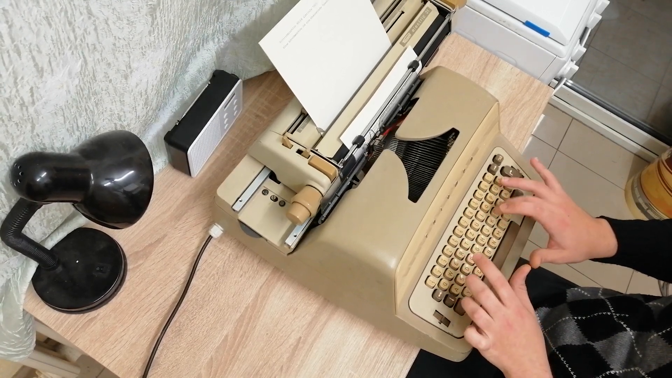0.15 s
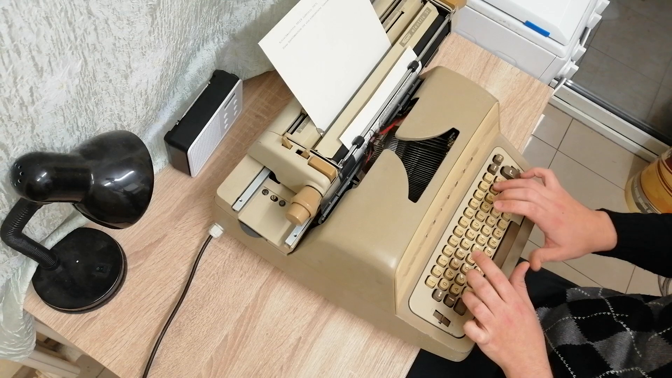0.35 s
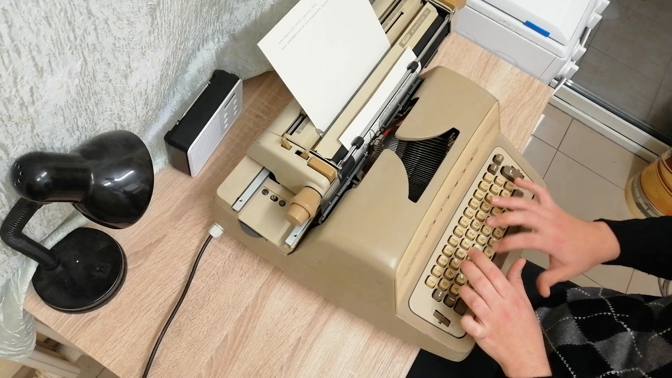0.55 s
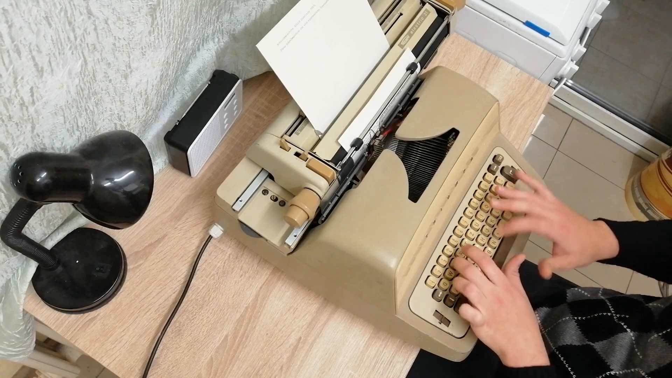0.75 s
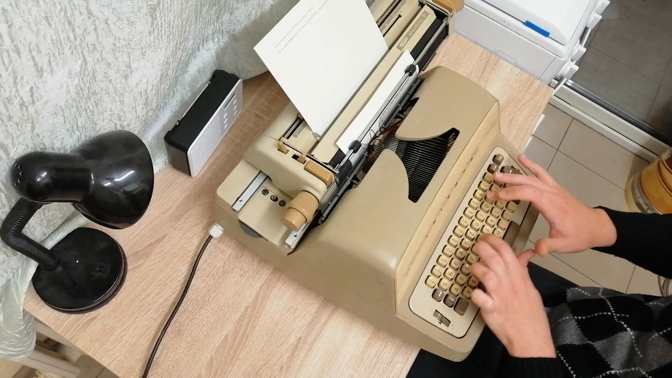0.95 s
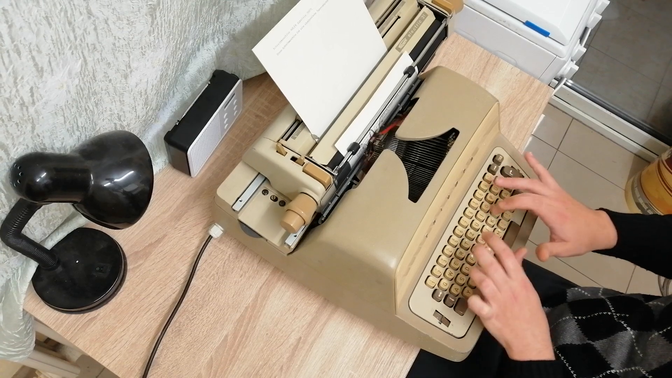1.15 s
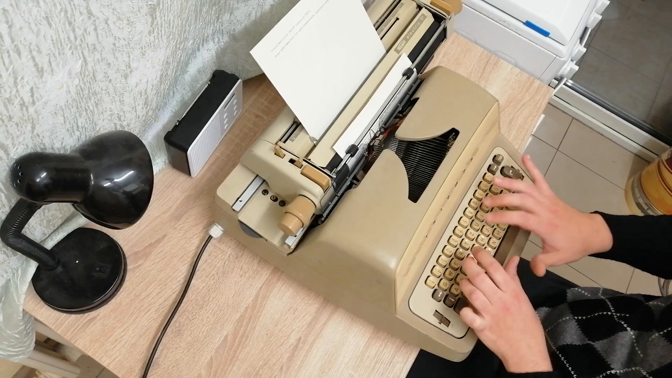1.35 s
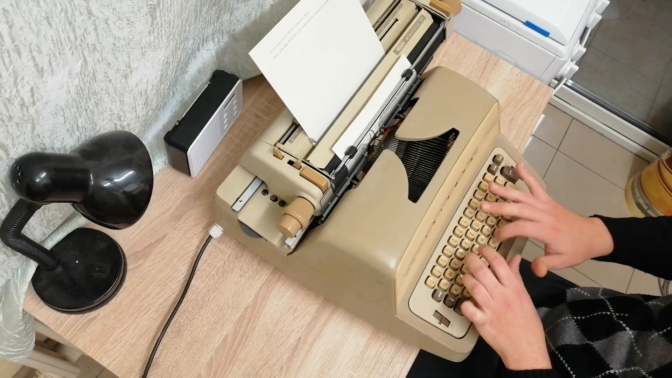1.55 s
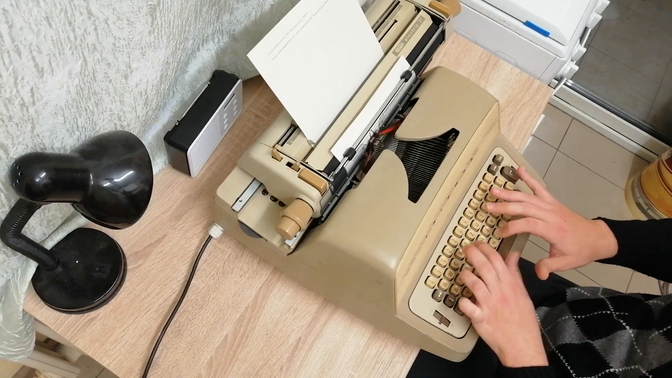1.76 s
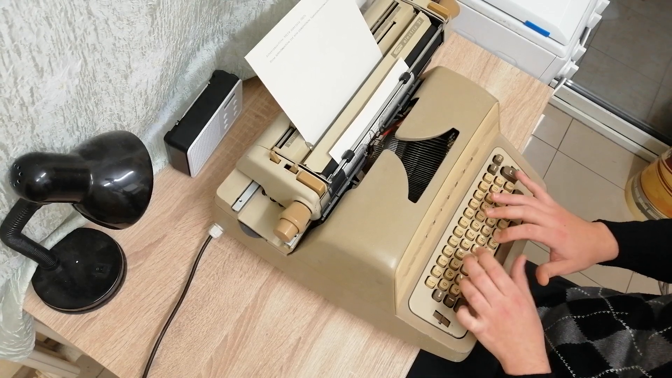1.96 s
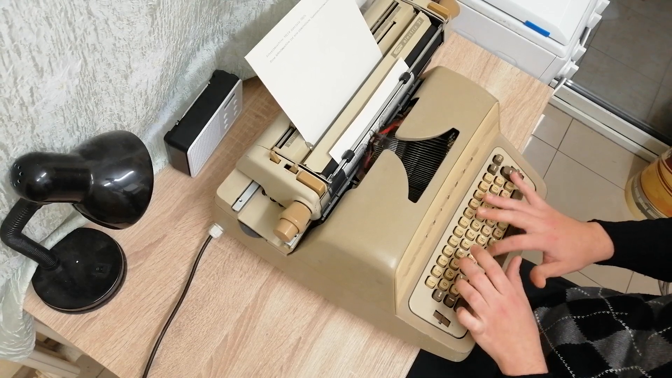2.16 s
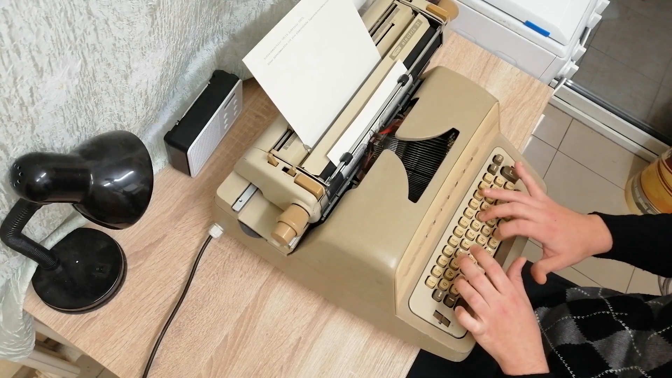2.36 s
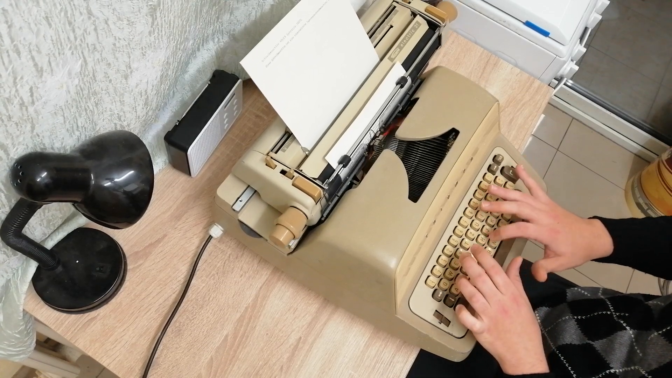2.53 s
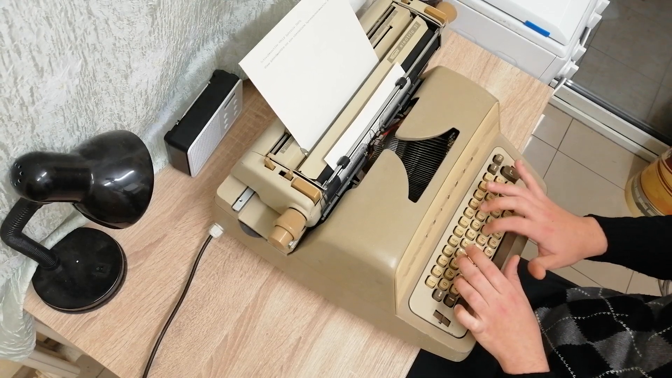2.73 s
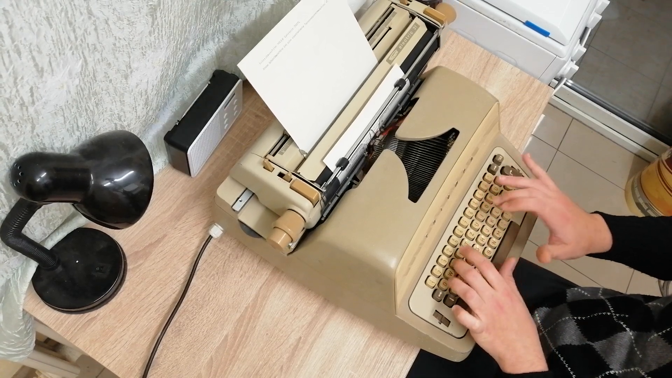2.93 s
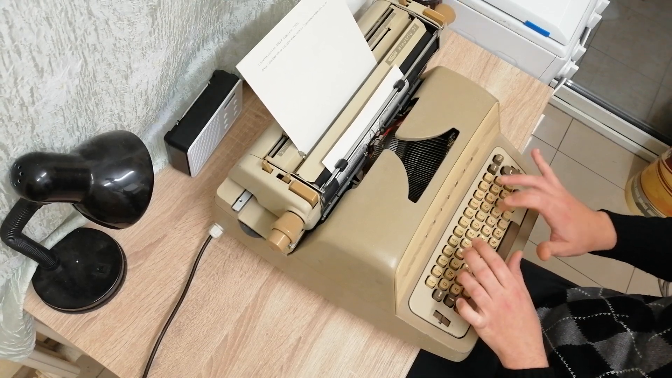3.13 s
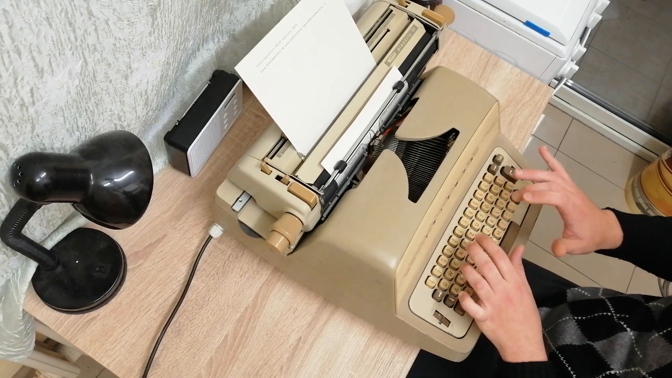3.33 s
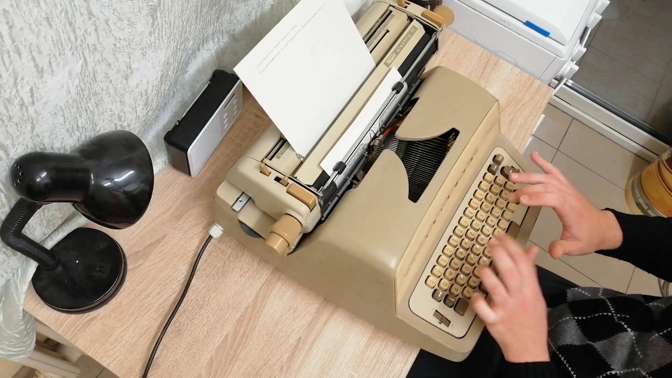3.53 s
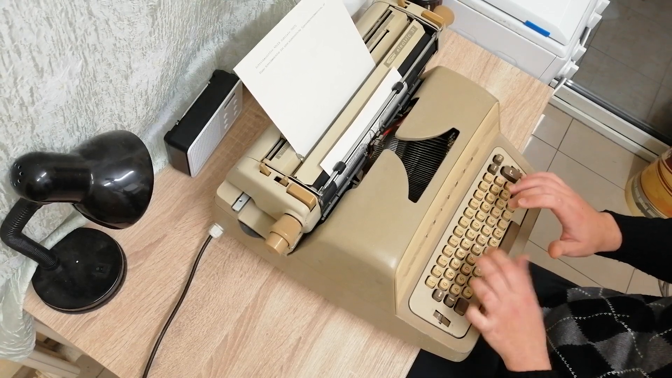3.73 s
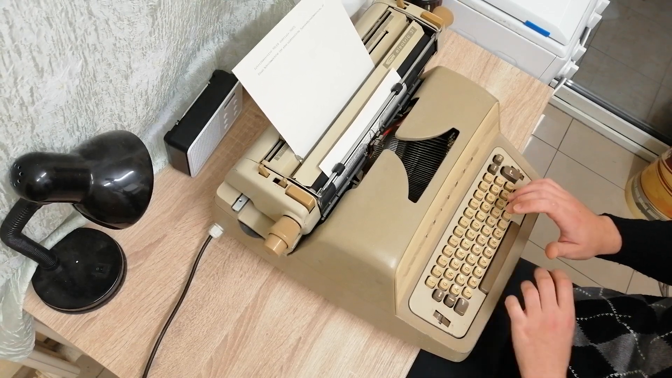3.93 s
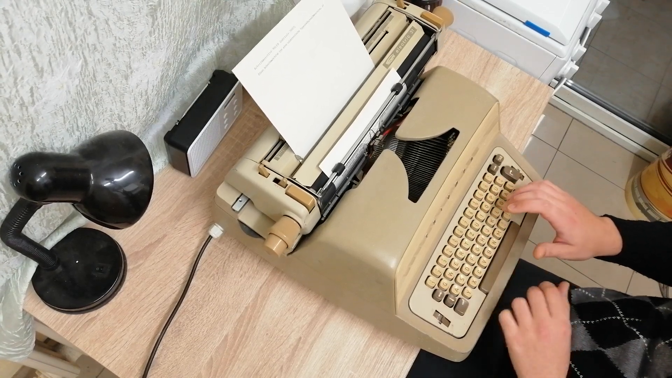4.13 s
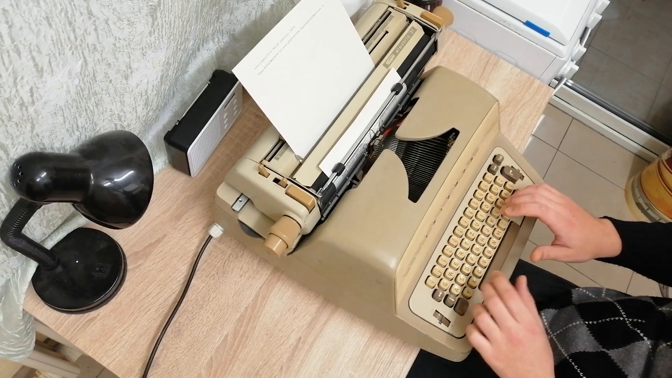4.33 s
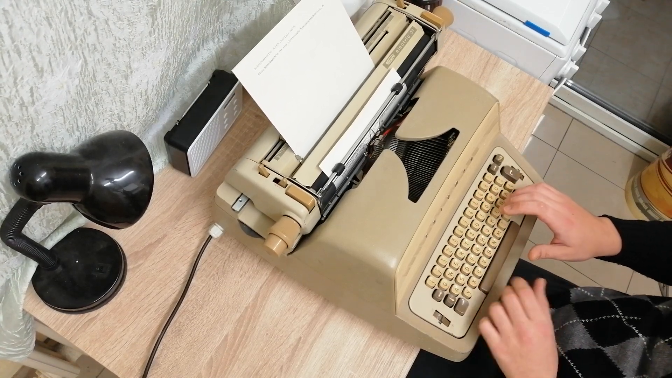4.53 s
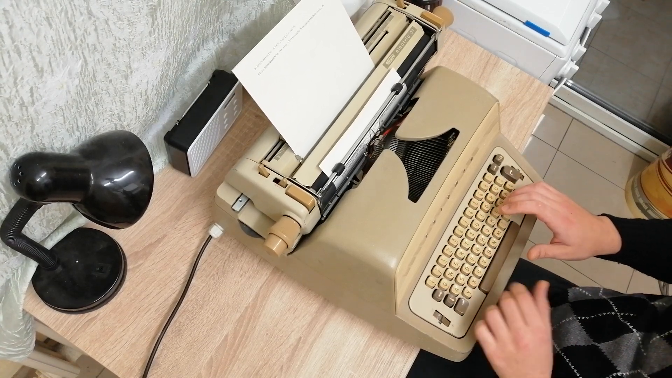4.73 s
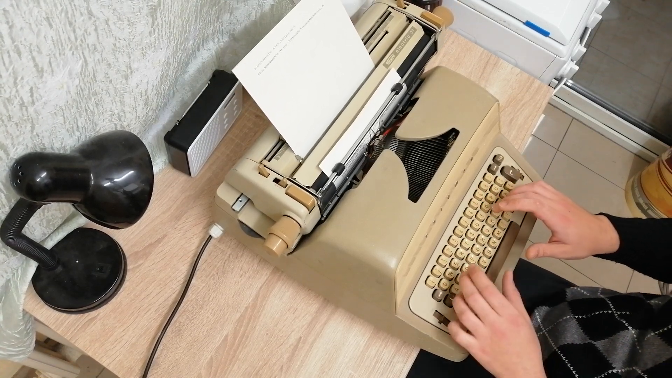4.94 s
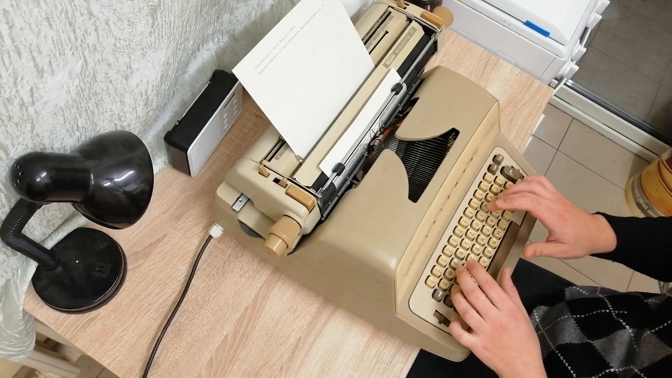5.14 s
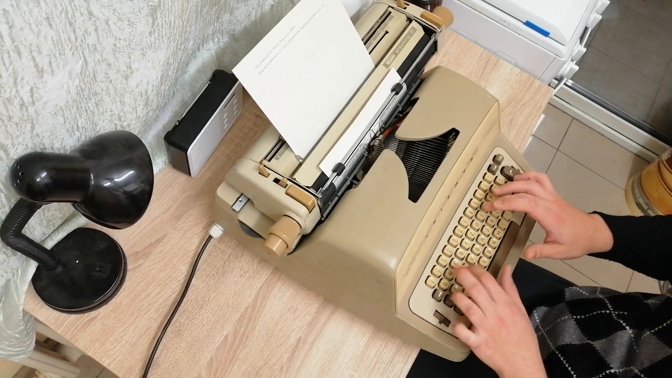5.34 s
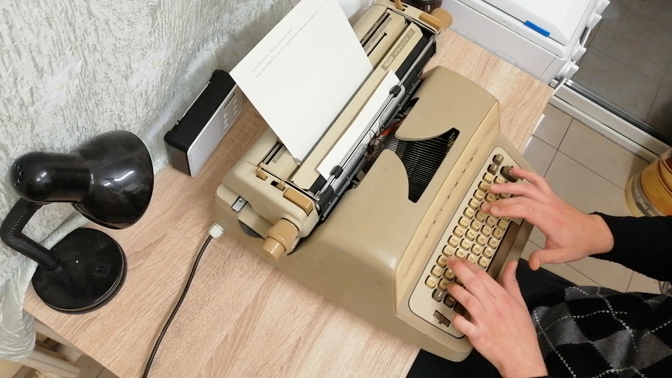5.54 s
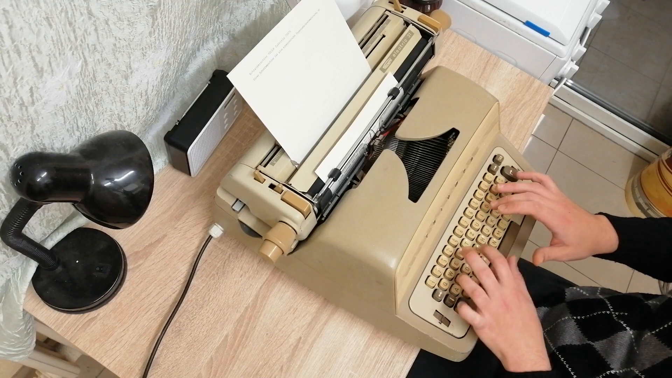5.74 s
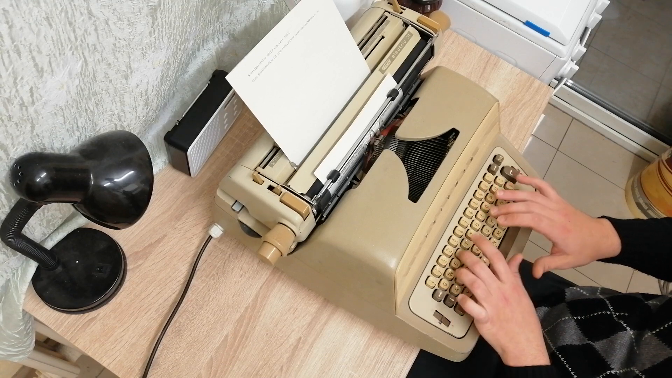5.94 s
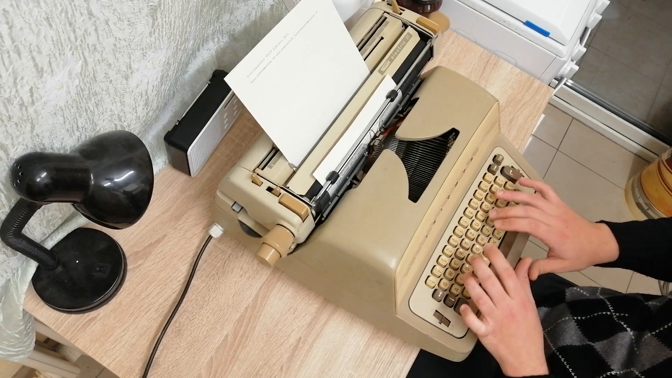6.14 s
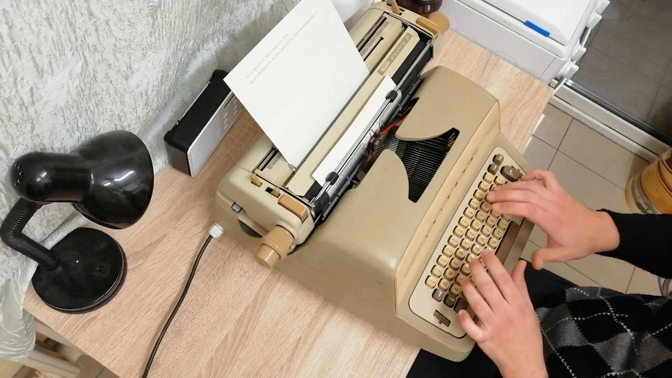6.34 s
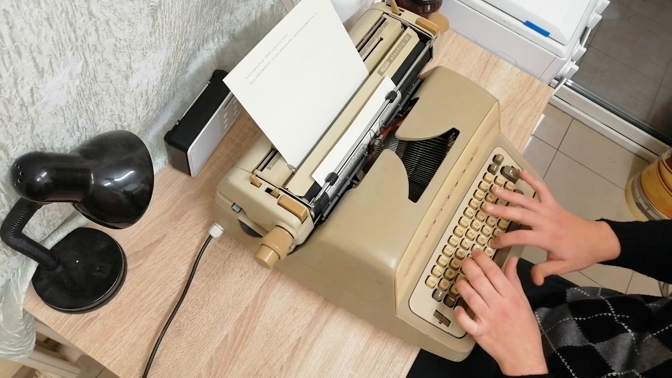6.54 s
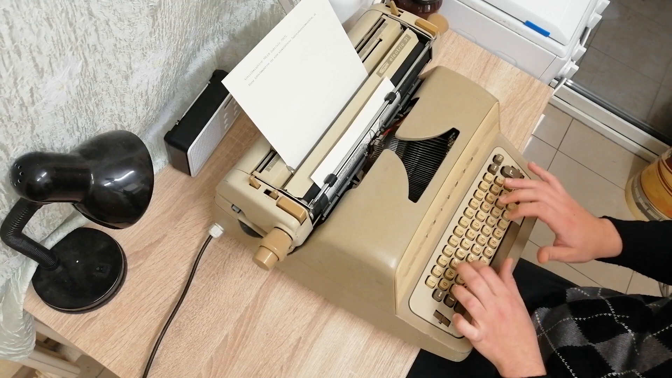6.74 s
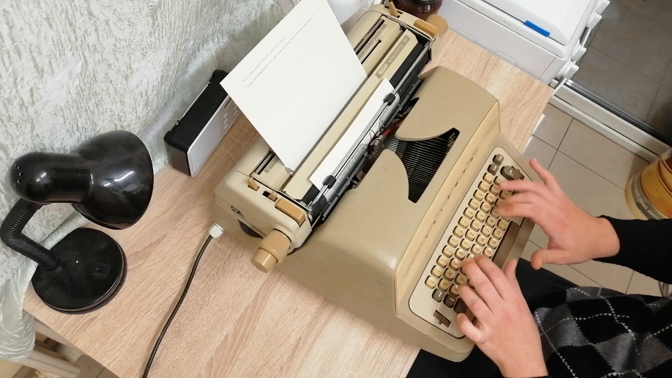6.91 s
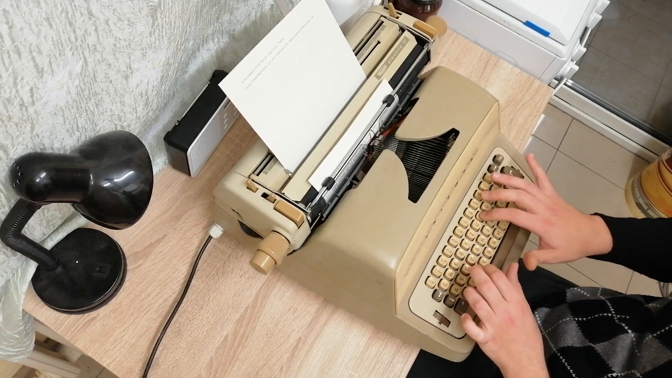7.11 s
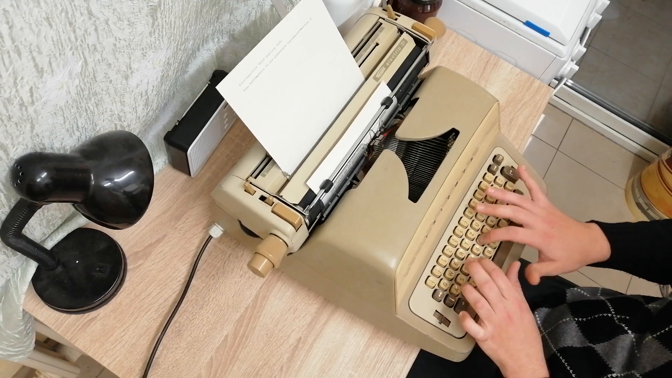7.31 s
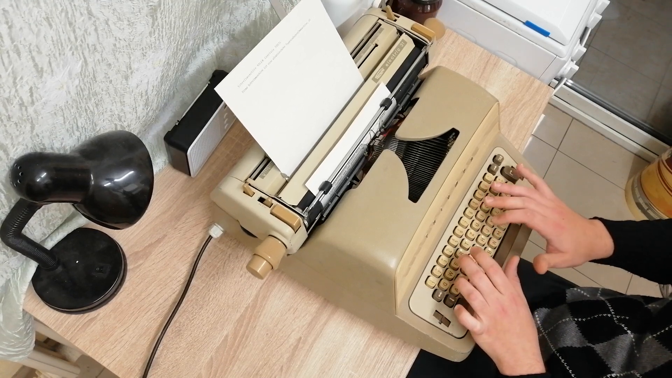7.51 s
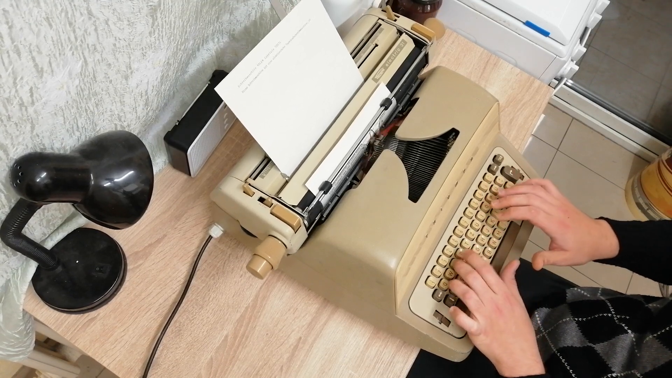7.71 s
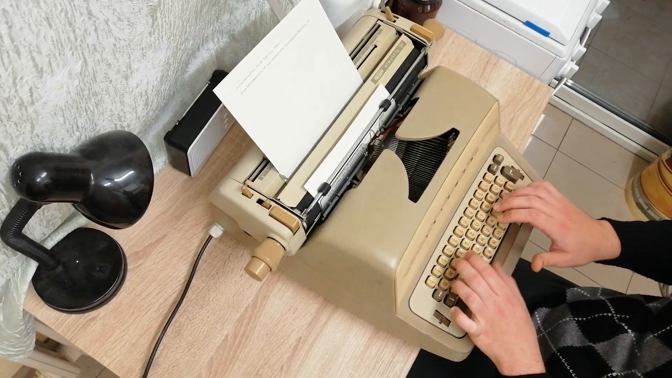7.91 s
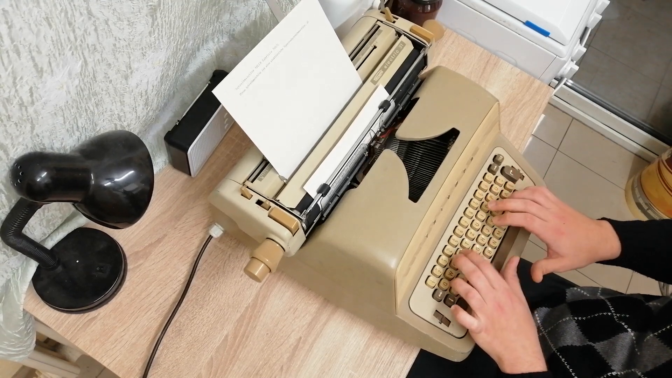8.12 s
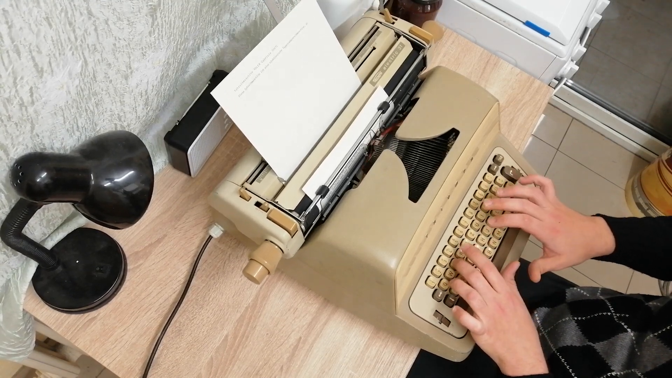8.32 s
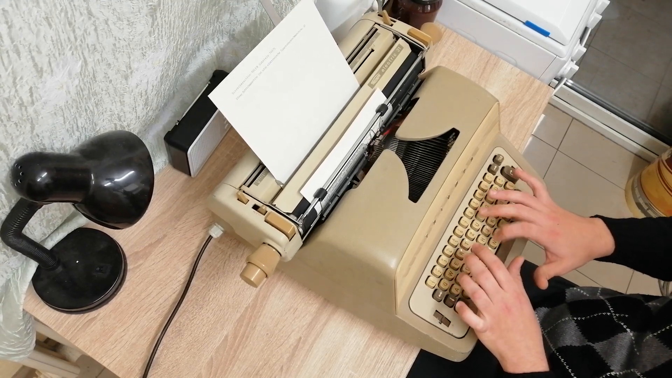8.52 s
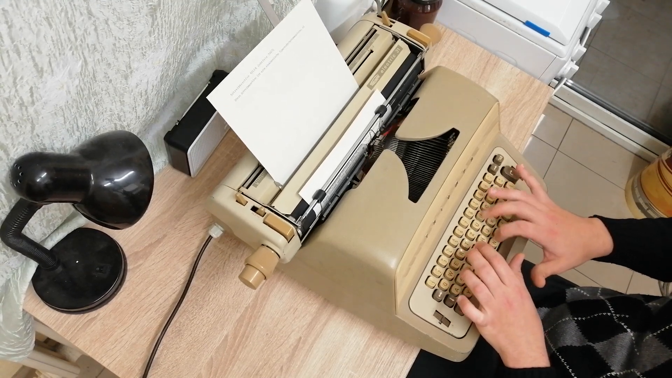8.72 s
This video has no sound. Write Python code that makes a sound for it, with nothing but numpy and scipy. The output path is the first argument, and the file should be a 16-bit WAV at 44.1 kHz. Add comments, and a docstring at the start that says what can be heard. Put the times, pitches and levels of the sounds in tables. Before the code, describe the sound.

Two bursts of crisp electric typewriter typing in a quiet room, each metallic snap followed by a low thud, split by a short near-silent pause.

```python
"""Electric typewriter in a quiet room

Someone types two bursts of words on a machine on a wooden desk, brushing and nudging keys in the pause.
Each letter: a key click, a lever's fling, the sharp crack of type on paper with the ring of the frame
(noise shaped by resonances and decay), the bar's return, and the carriage's step with a low damped thud.
The shift key thumps the type basket; a spring sings faintly; the motor hums in sine lines over a soft whir."""
import sys
import numpy as np
from scipy import signal
from scipy.fft import rfft, irfft
from scipy.io import wavfile
from scipy.ndimage import uniform_filter1d

SR = 44100
rng = np.random.default_rng(int(sys.argv[2]) if len(sys.argv) > 2 else 0)


def unload_wav(signal):
    """Save mono or channel-first audio to the path in sys.argv[1] as 16-bit WAV at rate SR, clipped to [-1, 1]."""
    wavfile.write(
        sys.argv[1],
        SR,
        np.round(np.clip(np.atleast_2d(signal).T, -1, 1) * 32767).astype(np.int16),
    )


N = 386757

# times (s) and frequencies (Hz) of one half-second blow
T = np.arange(SR // 2) / SR
HZ = np.fft.rfftfreq(len(T), 1 / SR)

# letters typed: blow_s, crack_level_db, brightness (treble tilt of the ring), key_click_level_db
LETTERS = [(-0.084, -14, -1, -35), (0.165, -9, 3, -42), (0.3957, -11.5, 5, -51), (0.7246, -12.5, 4, -41.5),
           (0.8437, -11, -1, -36), (0.955, -10.5, 0.5, -36), (1.1225, -5.5, 2, -37.5),
           (1.1984, -16, 1, -35), (1.3334, -10, 0, -37), (1.5221, -10, 0.5, -30), (1.6984, -9.5, 2, -33.5),
           (1.806, -8, 1, -36), (2.227, -15, 1.5, -40), (2.323, -22, -1, -36), (2.4253, -13.5, 1, -36),
           (2.539, -11.5, 2.5, -36), (2.7373, -8.5, 1.5, -35), (2.888, -10, 0, -34), (3.0229, -14, 0, -37),
           (3.2763, -12, 1, -45), (3.5421, -14.5, 0, -33), (5.4596, -11, 3, -35.5), (5.5491, -14, 0.5, -35),
           (5.6301, -11.5, 1, -35), (5.8915, -6, 5, -31), (6.0231, -12.5, 1, -38), (6.381, -10, 1.5, -45),
           (6.6296, -10.5, 3.5, -36.5), (6.8833, -8, 1, -35.5), (7.0538, -10, 2.5, -35),
           (7.211, -13.5, 1, -33.5), (7.313, -11.5, -1.5, -36), (7.4235, -10.5, 4.5, -36),
           (7.795, -13, -0.5, -37), (8.245, -8, 23, -35.5), (8.41, -20, 2, -36), (8.5284, -11, -0.5, -37),
           (8.6921, -12, 2.5, -40)]
# strokes of the space bar: blow_s, clack_level_db, key_click_level_db
SPACES = [(1.918, -25, -36), (3.911, -25.5, -38.5), (5.757, -25.5, -37), (7.974, -25.5, -38)]
# colour of a lever being flung or a latch tripping: frequency_hz, relative_level_db (per Hz)
LEVER_COLOUR = [(30, -19), (110, -9), (300, -0.5), (520, -10), (900, -1), (1350, -6), (2000, -4),
                (2700, -3.5), (4100, -10), (5800, -9), (8500, -11), (11000, -7), (12800, -12.5),
                (15000, -24.5)]


def amp(db):
    """Level to amplitude: 20 dB for each factor of ten."""
    return 10 ** (np.asarray(db) / 20)


def read(points, hz):
    """Interpolation of a table along straight lines on a logarithmic frequency axis."""
    f, value = np.transpose(points)
    return np.interp(np.log(hz + 1), np.log(f + 1), value)


def evened(x, size=None):
    """Normalization to rms 1: overall, or in the loudest stretch of size samples."""
    if size is None:
        return x / np.sqrt(np.mean(x ** 2) + 1e-20)
    power = uniform_filter1d(np.atleast_2d(x ** 2).mean(0), size, mode="constant")
    return x / np.sqrt(power.max() + 1e-20)


def add(mix, s, sound):
    """Superposition: a sound adds to the mix from time s, trimmed at both ends."""
    start = round(s * SR)
    sound = sound[..., max(-start, 0):]
    part = mix[:, max(start, 0):][:, :sound.shape[-1]]
    part += sound[..., :part.shape[1]]


def smooth_noise(shape, size):
    """Moving average of white noise: slow random variation of rms 1."""
    return evened(uniform_filter1d(rng.standard_normal(shape), size=size))


def noise_pair(hz):
    """Partial coherence: random spectra for two channels, alike in the bass."""
    # likeness of the channels: frequency_hz, correlation
    likeness = [(100, .99), (180, 0.94), (350, 0.59), (650, 0), (1400, 0.28), (3000, 0), (12000, 0)]
    a, b = rng.standard_normal((2, len(hz))) + 1j * rng.standard_normal((2, len(hz)))
    same = np.clip(read(likeness, hz), -1, 1)
    return np.array([a, same * a + np.sqrt(1 - same ** 2) * b])


def mode(hz, t60, rise_s):
    """Damped harmonic oscillation: a sine that builds up softly and loses 60 dB in t60 seconds."""
    t = np.arange(SR) / SR
    swing = np.sin(2 * np.pi * hz * t) * np.exp(-np.log(1000) * t / t60)
    return evened(swing * (1 - np.exp(-t / rise_s)), size=1100)


def metal_frame(width_hz=24, widening=.004, lean_db=1.8):
    """Modal resonance: the frame's dense fixed response, and the lift its main modes give to any blow."""
    # resonances of the metal frame: frequency_hz, lift_db
    resonances = [(301, 7.7), (420, 4.4), (797, 4.3), (926, 3.5), (1023, 5.2), (1701, 4.3), (1884, 3.7),
                  (2003, 4.1), (2110, 3.4), (2272, 4.9), (2412, 3.3), (2713, 3.9), (3144, 3.4), (3478, 3.3),
                  (3790, 3.9), (3919, 3.9), (4145, 3.1), (4867, 3.3), (4963, 4.5), (5146, 3.6), (5405, 4.2),
                  (5545, 4.8), (5954, 5.0), (6568, 3.5), (7235, 4.3), (7440, 4.4), (7860, 4.0), (9141, 4.0),
                  (10745, 4.9), (11305, 4.9)]
    lift_db = np.zeros(len(HZ))
    for hz, db in resonances:
        bandwidth_hz = width_hz + widening * hz
        lift_db += db / (1 + (2 * (HZ - hz) / bandwidth_hz) ** 2)
    # the top treble leans right
    lean = lean_db * np.tanh((HZ - 7500) / 2500) * np.minimum(HZ / 12000, 1) ** 2
    return noise_pair(HZ), amp(lift_db + np.array([[-1], [1]]) * lean)


def clatter(frame, colour, brightness=0, rise_s=0.0012, snap=0.2, snap_s=0.0069, varied_db=2,
            tail_s=0.098, rattle_db=1.73):
    """Impact excitation of many modes: partly the same each time, partly new, with a short loud head."""
    # how machine and room die away together: frequency_hz, t60_s
    decay = [(80, 0.94), (300, 0.45), (900, 0.41), (2200, 0.35), (6000, 0.37), (11000, 0.24), (15000, 0.2)]
    fixed, lift = frame
    repeat = .38  # share of the power that is the same in every blow
    tilt_db = brightness * .5 * np.tanh(2 * np.log((HZ + 1) / 3500)) * HZ / (HZ + 500)
    variation_db = varied_db * smooth_noise(len(HZ), size=30)  # the colour varies a little from blow to blow
    spectrum = (np.sqrt(repeat) * fixed + np.sqrt(1 - repeat) * noise_pair(HZ)) * lift
    steady = irfft(spectrum * amp(read(colour, HZ) + tilt_db + variation_db))

    # every frequency dies away at its own rate
    hz, t, z = signal.stft(steady, SR, nperseg=256)
    dying = z * amp(-60 * t / read(decay, hz)[:, None])
    ring = signal.istft(dying, SR, nperseg=256)[1][:, :len(T)]

    tail_fall = amp(-np.square(np.square(T / tail_s)))  # the ring's tail falls away faster and faster
    attack = (1 - np.exp(-T / max(rise_s, 1e-4))) ** 2
    chatter = smooth_noise(len(T), size=110)
    rattle = amp(rattle_db * chatter * np.exp(-T / 0.051))  # loose links chatter just after the blow
    head = 1 + snap * np.exp(-T / snap_s)
    return evened(ring * rattle * tail_fall * attack * head, size=1100)


def strokes():
    """The drive's time base: the blows of all letters and spaces, in order."""
    return np.sort([row[0] for row in LETTERS + SPACES])


def motor(waver=.3, whir_db=-61.2, uneven_db=3.2):
    """Periodic and random excitation: hum lines wavering in level and phase over a soft noise whir."""
    # hum and thin whines of the motor: frequency_hz, rms_level_db (before the waver)
    hum_lines = [(33, -69), (79, -72.5), (100, -65), (141, -68.5), (148, -72.5), (199, -70), (299, -75.5),
                 (398, -75.5), (530, -88), (660, -76.5), (991, -84), (1303, -87), (1437, -86.5),
                 (1852, -83), (2385, -77.5), (3165, -83.5), (3951, -86), (5744, -91.5)]
    # whir of the motor and its roller: frequency_hz, relative_level_db (per Hz)
    whir_colour = [(15, -9.5), (35, -3), (55, -10.5), (90, -1.5), (150, -6), (240, -12.5), (500, -12),
                   (1200, -18.5), (2100, -16), (3000, -19.5), (4500, -28), (5700, -30), (8500, -34),
                   (16000, -40)]
    hz, t = np.fft.rfftfreq(N, 1 / SR), np.arange(N) / SR
    variation_db = uneven_db * smooth_noise(len(hz), size=180)  # uneven random colour of the whir
    whir = evened(irfft(noise_pair(hz) * amp(read(whir_colour, hz) + variation_db), N))

    knots = np.linspace(0, t[-1], num=70)
    hum = np.zeros(N)
    for line_hz, db in hum_lines:
        swell = np.interp(t, knots, rng.standard_normal(len(knots)))
        drift = np.interp(t, knots, rng.standard_normal(len(knots)))
        line = np.sin(2 * np.pi * line_hz * t + 2 * waver * drift)
        hum += amp(db) * np.sqrt(2) * (1 + waver * swell) * line
    return amp(whir_db) * whir + hum


def spring(hz=398, t60=1.5, letter_db=-64, space_db=-58):
    """Free vibration: each release plucks the carriage spring, the space bar hardest, to one dying note."""
    out = np.zeros((2, N))
    note = mode(hz, t60, rise_s=0.011)
    for rows, db in [(LETTERS, letter_db), (SPACES, space_db)]:
        for s, *_ in rows:
            add(out, s, amp(db) * rng.choice([-1, 1]) * note)
    return out


def shift(frame):
    """Impact of a large mass: the type basket lands with a deep modal thump and a dull clunk."""
    # the heavy basket drops and lifts, and bounces: landing_s, thump_level_db, clunk_level_db
    landings = [(8.081, -26, -27.5), (8.117, -20, -21), (8.138, -24, -30), (8.298, -45, -29.5),
                (8.339, -45, -29), (8.366, -20.3, -20.5)]
    # modes that the basket shakes: frequency_hz, relative_level_db, t60_s
    basket_modes = [(85, -6, 0.12), (141, 4.5, .2), (173, -15, 0.1), (240, -7, 0.16), (312, -10, 0.2),
                    (415, -12, 0.25), (640, -17, 0.18), (927, -21, 0.16)]
    # colour of the clunk: frequency_hz, relative_level_db (per Hz)
    clunk_colour = [(30, -14), (70, 1), (150, 5), (400, -2), (570, -10), (850, -1), (1500, -6),
                    (2400, -5.5), (4000, -20), (15000, -20)]
    out = np.zeros((2, N))
    for s, thump_db, clunk_db in landings:
        thump = sum(amp(db) * mode(hz, t60, rise_s=0.0025) for hz, db, t60 in basket_modes)
        add(out, s, amp(thump_db) * evened(thump, size=1100))
        add(out, s, amp(clunk_db) * clatter(frame, clunk_colour, snap=0.6, snap_s=0.035, varied_db=4.0))
    return out


def carriage(frame, desk_hz=87, case_hz=142, desk_db=-40.5, case_db=-42.0, knock_db=-43,
             step_s=0.057, desk_lag_s=.013, scatter_s=.003, uneven_db=1.6):
    """Momentum transfer: after every stroke the carriage's stop knocks and rocks the case, then the desk."""
    # colour of the carriage's stop: frequency_hz, relative_level_db (per Hz)
    knock_colour = [(30, -22), (60, -5.5), (200, 0.5), (320, -6), (520, -16.5), (1500, -15.5), (15000, -44)]
    out = np.zeros((2, N))
    for s in strokes():
        late, low, high, desk_force, case_force = rng.standard_normal(5)
        stop_s = s + step_s + scatter_s * late
        add(out, stop_s - .006, amp(knock_db) * clatter(frame, knock_colour, rise_s=0.0015))
        case = mode(case_hz * (1 + 0.015 * high), t60=0.29, rise_s=0.0038)
        add(out, stop_s, amp(case_db + uneven_db * case_force) * case)
        desk = mode(desk_hz * (1 + .014 * low), t60=0.34, rise_s=.007)
        add(out, stop_s + desk_lag_s, amp(desk_db + uneven_db * desk_force) * desk)
    return out


def keyboard(frame, key_brightness=0.5, latch_db=-10, grain_db=2.2,
             key_lead_s=0.0465, usual_key_db=-35, slower_s_per_db=0.0005):
    """Light impacts and friction: key clicks ahead of strokes, duller bar and shift clacks, finger brushes."""
    # the shift key is pressed, then let go: clack_s, clack_level_db, key_click_level_db
    shift_key = [(8.072, -26.5, -39), (8.296, -35, -40)]
    # keys nudged in the pause without typing: nudge_s, level_db, brightness (treble tilt)
    nudges = [(4.269, -39.5, 0), (4.295, -43, -6)]
    # fingers brush over the keys: start_s, level_db, length_s
    brushes = [(4.738, -49.5, 0.2), (5.135, -53, 0.13)]
    # colours of click, nudge, clack and brush: frequency_hz, relative_level_db (per Hz)
    click_colour = [(30, -24), (110, -7), (300, -3.5), (520, -8), (900, -5.5), (1350, -3), (2000, 0),
                    (2700, -4), (4100, -7.5), (5800, -3.5), (8500, -7.5), (11000, -1.5), (12800, -14),
                    (15000, -17)]
    nudge_colour = [(30, -24), (300, -13), (1000, -7), (1500, 2), (2300, 1), (4000, -4), (6000, -13),
                    (9000, -19), (15000, -28)]
    clack_colour = [(30, -21.5), (110, -6), (300, -20.5), (520, -8), (900, -6.5), (1350, -5), (2000, -0.5),
                    (2700, -4), (4100, -11), (5800, -12), (8500, -16.5), (11000, -13), (12800, -21),
                    (15000, -33)]
    brush_colour = [(100, -12), (300, -2), (600, -3), (1000, -1), (1900, 1.5), (3000, -6.5), (5000, -17.5),
                    (15000, -40)]
    out = np.zeros((2, N))
    for s, *_, click_db in LETTERS + SPACES + shift_key:
        # a gentler finger takes longer to trip the lever
        lead_s = key_lead_s + slower_s_per_db * (usual_key_db - click_db)
        click = clatter(frame, click_colour, key_brightness, rise_s=.0018, snap=.8, snap_s=0.0024)
        add(out, s - lead_s, amp(click_db) * click)
    for s, db, brightness in nudges:
        nudge = clatter(frame, nudge_colour, brightness, rise_s=.005, snap=.8, snap_s=0.0024)
        add(out, s, amp(db) * nudge)
    for s, db, _ in SPACES + shift_key:
        # a latch trips just before the clack
        add(out, s - .014, amp(db + latch_db) * clatter(frame, LEVER_COLOUR, rise_s=.002))
        add(out, s - .001, amp(db) * clatter(frame, clack_colour, snap_s=.008))
    for s, db, length_s in brushes:
        rub = evened(irfft(noise_pair(HZ) * frame[1] * amp(read(brush_colour, HZ))))
        catching = amp(grain_db * smooth_noise(len(T), size=260))  # skin catches on the key edges
        stroke = np.sin(np.pi * np.minimum(T / length_s, 1)) ** 2
        add(out, s, amp(db) * rub * catching * stroke)
    return out


def crack(ripple_db=2.5, desk=.38, wall=.35, far=.18):
    """Impulse and early reflections: type hits paper, echoed by the machine and what stands near."""
    # colour of the crack: frequency_hz, relative_level_db (per Hz)
    crack_colour = [(30, -35), (110, -21), (300, -12), (520, -9.5), (900, -18), (1350, -4.5), (2000, -5.5),
                    (2700, 2.5), (4100, -14.5), (5800, 4.5), (8500, -5.5), (11000, 0.5), (12800, -13),
                    (15000, -19)]
    hz = np.fft.rfftfreq(1024, 1 / SR)
    out = np.zeros((2, len(T)))
    for delay_s, gain in [(0, 0.52), (.002, desk), (.0047, wall), (.0096, far)]:
        ripple = smooth_noise((2, len(hz)), size=18)
        # folding the cepstrum gives minimum phase: the energy gathers at the front
        cepstrum = irfft(np.log(amp(read(crack_colour, hz) + ripple_db * ripple)))
        cepstrum[:, 1:512] *= 2
        cepstrum[:, 513:] = 0
        pulse = evened(irfft(np.exp(rfft(cepstrum))), size=52)
        for side in range(2):
            arrival_s = delay_s * (1 + 0.046 * rng.standard_normal())
            add(out[side:side + 1], arrival_s, gain * pulse[side])
    return out


def typebars(frame, ring_db=-20.5, lever_db=-28, lever_lead_s=.0125, landing_db=-25.5, landing_s=0.0415,
             bounce_db=-29.5, kick_db=-41.5, kick_hz=90, scatter_s=.0015):
    """Lever and impact: flung with the motor's even force, each bar strikes, rattles and falls to rest."""
    # colours of the frame's ring and of the bar's return: frequency_hz, relative_level_db (per Hz)
    ring_colour = [(30, -23.5), (110, -10), (300, -7), (520, -12), (900, -7.5), (1350, -3.5), (2000, 2),
                   (2700, -2), (4100, -7), (5800, -4), (8500, -8), (11000, -3.5), (12800, -14.5),
                   (15000, -17.5)]
    landing_colour = [(30, -17), (110, 1.5), (300, -7), (520, -6.5), (900, -5), (1350, -7.5), (2000, 0.0),
                      (2700, -1), (4100, -7.5), (5800, -6.5), (8500, -5.5), (11000, 0.5), (12800, -9),
                      (15000, -16.5)]
    out = np.zeros((2, N))
    for s, hit_db, brightness, _ in LETTERS:
        force, lead, bounce, fall = rng.standard_normal(4)
        flung_s = s - lever_lead_s + .0006 * lead
        add(out, flung_s, amp(lever_db + .7 * force) * clatter(frame, LEVER_COLOUR, rise_s=0.0028))
        recoil = mode(kick_hz * (1 + 0.04 * bounce), t60=0.16, rise_s=.009)  # the desk rocks at the blow
        add(out, flung_s + .007, amp(kick_db) * recoil)

        add(out, s, amp(hit_db) * crack())
        ring = clatter(frame, ring_colour, brightness - 0.5, rise_s=0.00091, snap=0.4, snap_s=0.022)
        add(out, s, amp(ring_db) * ring)

        # the bar rattles in its guide, then falls back on its rest
        guide = clatter(frame, landing_colour, -6.5, rise_s=0.0011, snap=0.78, snap_s=0.0014)
        add(out, s + .017 + .003 * bounce, amp(bounce_db) * guide)
        rest = clatter(frame, landing_colour, 2.0, rise_s=0.00043, snap=0.18, snap_s=0.0053)
        add(out, s + landing_s + scatter_s * fall, amp(landing_db) * rest)
    return out


def scene():
    """Superposition of the sources; the parts that clatter share one frame."""
    frame = metal_frame()
    background = motor() + spring()
    return background + shift(frame) + carriage(frame) + keyboard(frame) + typebars(frame)


def record(dry, edge_hz=15500):
    """Saturation and band limiting: the sharpest peaks are rounded, then a low-pass removes the top."""
    rounded = dry / (1 + dry ** 4) ** .25
    low_pass = signal.firwin(255, edge_hz, window=("kaiser", 9), fs=SR)
    return signal.oaconvolve(rounded, low_pass[None], "same")


dry = scene()
out = record(dry)
unload_wav(out)
```